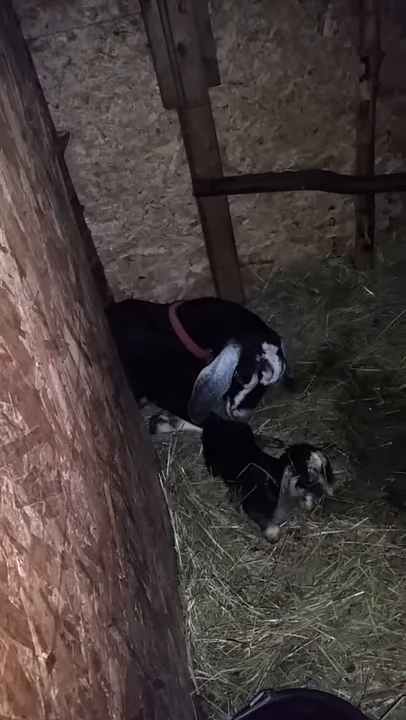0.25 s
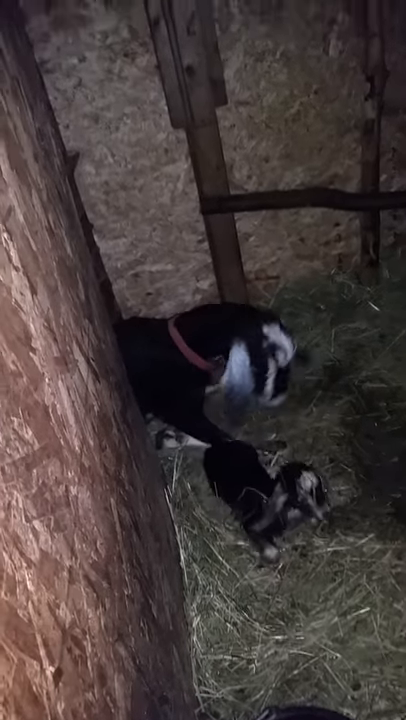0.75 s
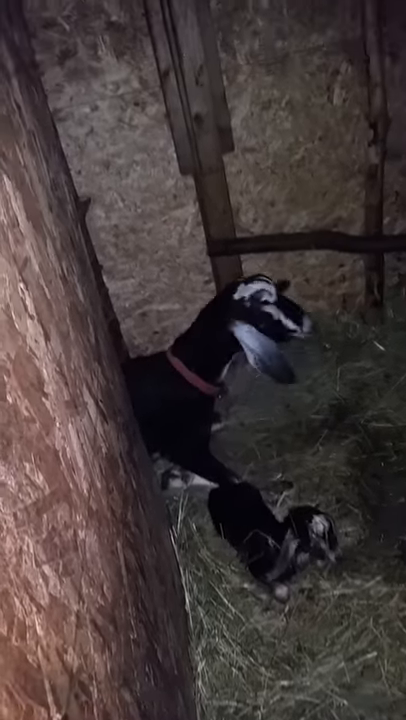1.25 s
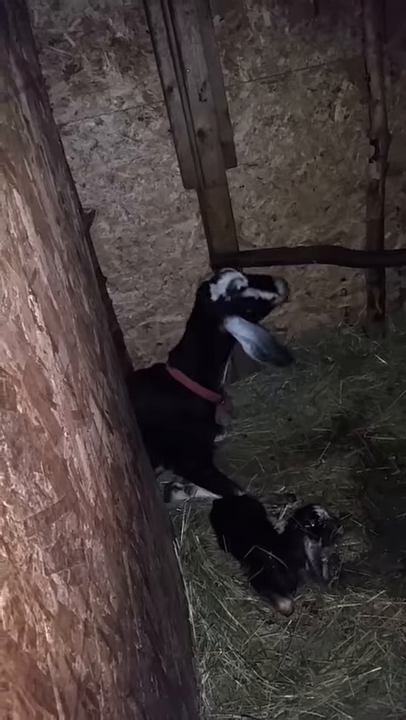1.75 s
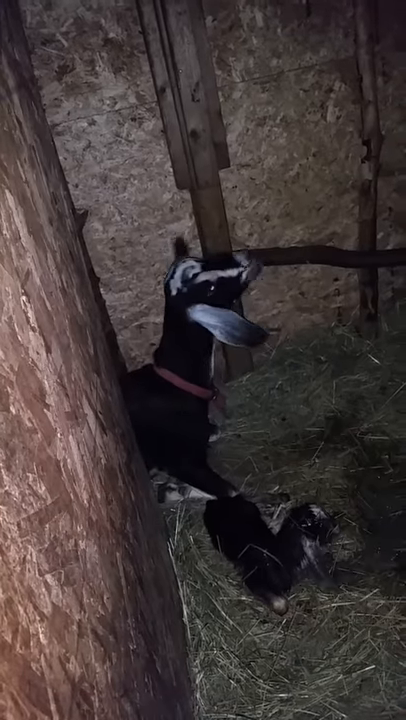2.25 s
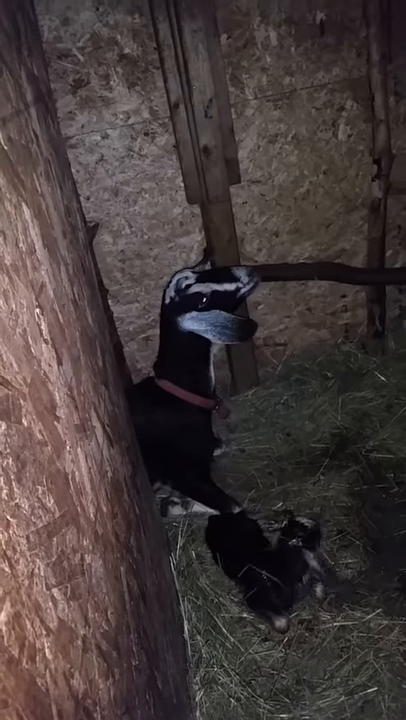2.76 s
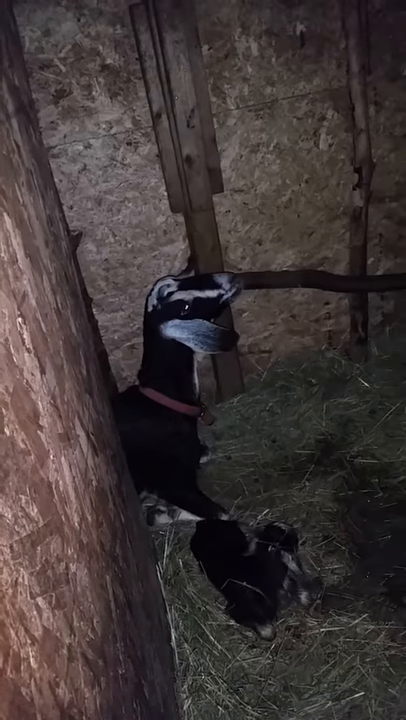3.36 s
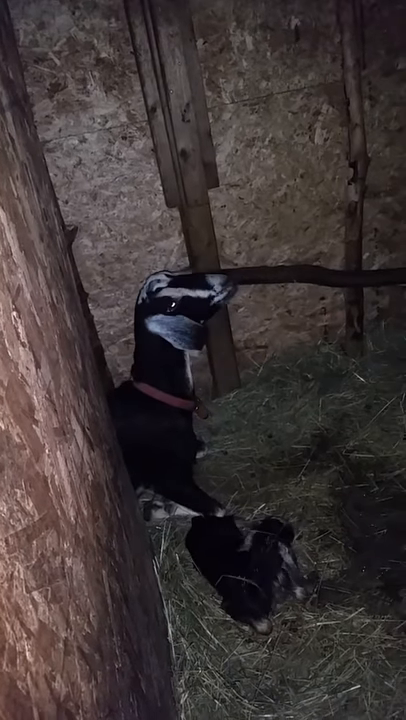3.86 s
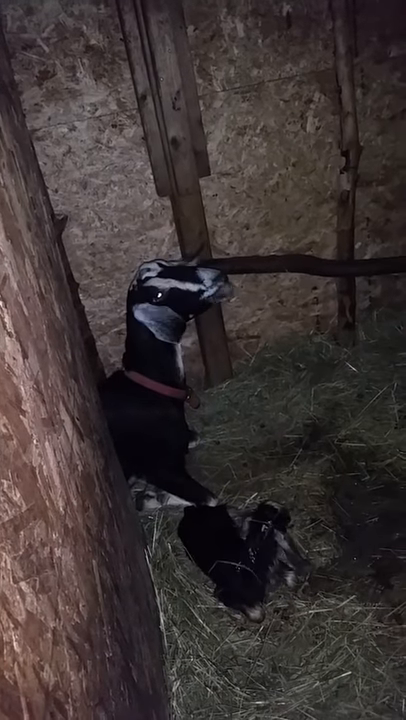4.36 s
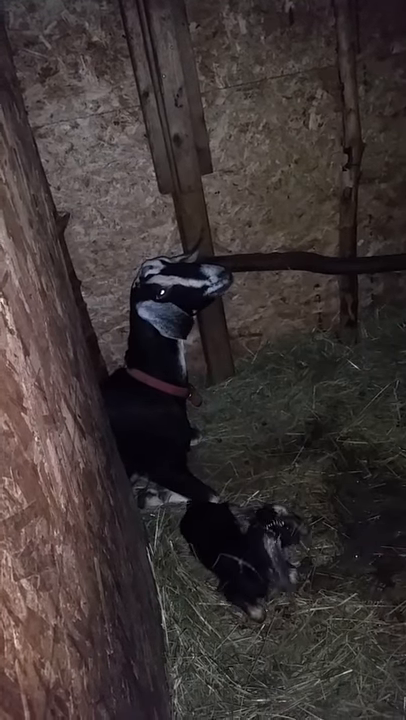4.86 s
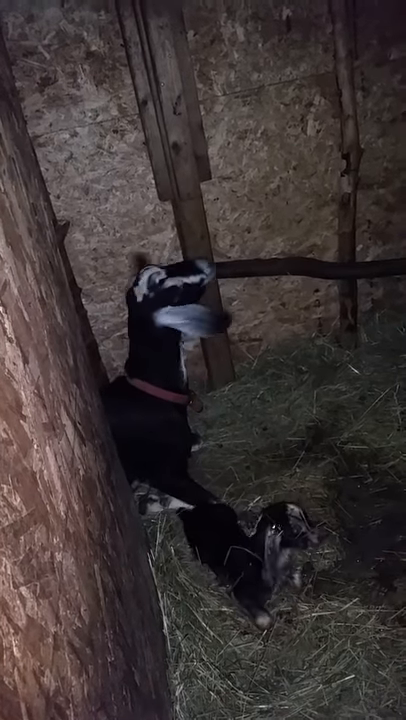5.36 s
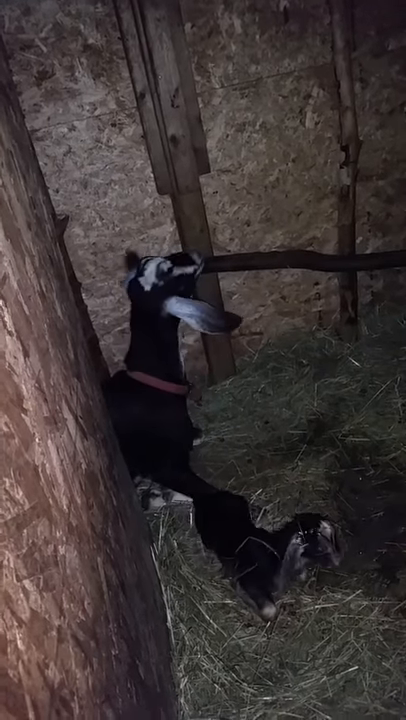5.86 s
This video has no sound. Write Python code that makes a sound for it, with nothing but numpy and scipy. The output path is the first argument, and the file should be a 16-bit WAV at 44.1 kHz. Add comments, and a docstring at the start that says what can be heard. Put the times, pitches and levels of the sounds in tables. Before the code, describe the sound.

Handheld phone in a quiet goat pen: low rumble, thin hiss that comes and goes, dull handling bumps and slight straw rustles. A nearby goat hums through its nose in brief broken pulses, twice in the calm first half. Then a large dog beyond the left wall erupts in three gruff barks, low growls and soft woofs, and two final barks, the boards giving a short dense ring. The goat grunts weakly underneath.

```python
"""Goat pen with a dog outside

Wooden shed bedded with straw. A goat close by on the left gives short nasal bleats: a buzz shaped by the nose.
Outside, a big dog barks three times, then twice, with soft woofs and growls between: pitch-arched partials
and throat noise, dulled by the walls; the shed rings as a dense decaying noise tail.
A fine high hiss comes and goes over a low rumble (filtered noise), with a few brief straw rustles;
bumps on the hand-held phone are damped swings."""
import sys
import numpy as np
from scipy import signal
from scipy.fft import rfft, irfft
from scipy.io import wavfile
from scipy.ndimage import uniform_filter1d

SR = 44100
rng = np.random.default_rng(int(sys.argv[2]) if len(sys.argv) > 2 else 0)


def wrap_up_sound(samples):
    """Save the sound to the file named by the first command line argument, as 16-bit audio."""
    columns = np.atleast_2d(samples).T
    # keep every value between -1 and 1, then stretch to whole-number steps
    tamed = np.clip(columns, -1, 1)
    steps = np.round(tamed * 32767).astype(np.int16)
    wavfile.write(sys.argv[1], SR, steps)


N = 269583
T = np.arange(N) / SR

# Background. Levels over time are relative; gains follow in background().
# rumble spectrum: (frequency [Hz], gain [dB])
RUMBLE_SPECTRUM = [(12, -40), (20, -11.5), (38, -1), (102, -1), (138, -13.5), (255, -12.5), (387, -19.5),
                   (439, -13.5), (526, -20), (905, -31.5), (1500, -34), (1950, -76.5), (3300, -120)]
# low rumble: (time [s], level [dB])
RUMBLE_LEVEL_DB = [(0.0, -60), (0.34, -64), (0.71, -60.5), (0.92, -66.5), (1.87, -62.5), (2.64, -67),
                   (3.18, -61), (3.3, -58), (3.79, -60.5), (4.3, -60), (4.53, -63.5), (4.76, -63),
                   (4.93, -54.5), (5.09, -57.5), (5.33, -60), (5.72, -59.5), (5.82, -61.5), (6.11, -71.5)]
# rumble colour at each microphone: (frequency [Hz], gain [dB])
RUMBLE_LEFT = [(30, -7.5), (70, -1.0), (150, 9.5)]
RUMBLE_RIGHT = [(30, 13.3), (70, 0.83), (150, 1.1)]
# murmur of the air in the shed: (time [s], level [dB])
AIR_LEVEL_DB = [(0, -70), (.8, -73), (1.15, -70), (1.5, -71), (2.3, -69.5), (2.7, -77), (3.2, -68),
                (4.6, -67), (6.1, -65.5)]
# microphone noise spectrum: (frequency [Hz], gain [dB])
MIC_SPECTRUM = [(500, -3.5), (1000, -3), (1500, -2), (2400, 4), (2800, -0.5), (3500, -12), (5000, -16),
                (8500, -19), (10000, -22.5)]
# high hiss spectrum: (frequency [Hz], gain [dB])
HISS_SPECTRUM = [(4000, -27), (7800, -33), (9000, -16.5), (9700, -4.5), (10400, -3), (12000, 3),
                 (13500, -9), (15600, -4)]
# high hiss: (time [s], level [dB])
HISS_LEVEL_DB = [(0.0, -85), (0.54, -85.5), (0.66, -76), (0.95, -92.5), (2.11, -84.5), (2.6, -93),
                 (3.18, -91.5), (3.42, -82), (3.57, -78), (4.2, -74.5), (4.61, -82), (4.93, -82.5),
                 (5.34, -74), (5.7, -79), (5.89, -81), (6.11, -88)]
# brief straw rustles, same spectrum as the hiss: (middle [s], half length [s], relative level [dB])
STRAW_RUSTLES = [(0.608, 0.058, -69), (1.835, .012, -80), (3.407, .016, -68), (3.5, .014, -72),
                 (5.721, 0.017, -64), (5.78, 0.034, -67.5)]

# bumps on the phone: (time [s], relative level [dB], swing pitch [Hz])
PHONE_BUMPS = [(0.071, -43.5, 61), (1.162, -55, 64.6), (1.3, -54, 75.4), (2.251, -48, 51.1),
               (2.457, -57, 48.4), (3.108, -52, 59.2), (3.157, -53.5, 75.4), (4.398, -44.5, 61.9),
               (4.982, -42, 56.5), (5.029, -43, 83.4), (5.235, -43, 71.4), (6.048, -48, 43.1)]
# bump colour at the left microphone: (frequency [Hz], gain [dB])
BUMP_LEFT = [(35, -6), (80, -2.5), (200, -5.5)]

# reverberation of the shed: (frequency [Hz], t60 before straw damping [s])
SHED_T60 = [(200, 0.08), (500, 0.56), (1000, 0.76), (2500, 0.99), (5000, 1), (12000, 0.72)]

# bleats: (middle [s], nominal length [s], top pitch [Hz], nose level [dB], rasp level [dB],
#          whistle level before a common trim [dB])
GOAT_BLEATS = [(0.082, 0.047, 458.6, -60.5, -91, -69.5), (0.194, 0.062, 482.4, -48, -72, -56.5),
               (.312, 0.09, 445.3, -62.5, -86, -78), (1.711, 0.05, 469.6, -57, -94, -70.5),
               (1.828, 0.064, 479.6, -51, -71, -58), (1.951, 0.089, 478.5, -52.5, -69.5, -57),
               (2.041, 0.078, 451.4, -62, -83, -69), (3.388, 0.063, 456, -63, -75, -67),
               (3.447, 0.079, 473, -68, -67.5, -71), (3.501, 0.056, 487.4, -44.5, -62, -53),
               (3.585, 0.12, 462, -72, -73.5, -78), (5.007, 0.041, 473.2, -52, -79, -65)]
# goat's nose, mouth shut: (frequency [Hz], gain [dB])
NOSE_RESONANCE = [(300, 4), (480, 2.5), (950, 0), (1430, -2.5), (1900, -0.5), (2380, -7.5), (3300, -25),
                  (4500, -29.5), (6000, -39.5), (7800, -61.5), (14000, -53)]
# rasp in its nostrils: (frequency [Hz], gain [dB])
NOSTRIL_RASP = [(2700, -11.5), (3400, -23), (4050, 1), (4500, 1.5), (5100, -10.5), (6100, -14.5),
                (6500, -14), (6900, -10), (7600, -36)]
# its thin whistle: (frequency [Hz], gain [dB])
NOSE_WHISTLE = [(6500, -28), (7800, -27.5), (8500, -3), (9000, 5), (9500, -5), (10300, -3.5), (11000, -19),
                (12700, -16), (14000, -46)]
# goat at the right microphone: (frequency [Hz], gain [dB])
GOAT_FAR_SIDE = [(500, -24.0), (2000, -27), (4500, -28), (9000, -39)]
# goat's sound sent to the shed: (frequency [Hz], gain [dB])
GOAT_RING = [(4500, 0), (9000, -10)]

# dog's throat heard through the wall: (frequency [Hz], gain [dB])
DOG_THROAT = [(280, -11), (420, 3.5), (540, 2.5), (670, -10), (840, 2), (1080, -6.5), (1230, -8),
              (1400, -19), (1620, -18.5), (1850, -24), (2120, -17), (2700, -30.5), (3400, -50), (4050, -45),
              (4800, -57), (7000, -63)]
# growls: (start [s], length [s], mid pitch [Hz], low level [dB], throat level [dB])
DOG_GROWLS = [(3.305, 0.058, 165, -48.5, -63), (4.142, 0.12, 210.5, -51, -51),
              (4.383, 0.11, 211.7, -47, -50.5), (4.725, 0.086, 148.8, -49.5, -67.5),
              (4.84, .05, 157.4, -53, -63.5), (5.131, 0.032, 201, -42, -53.5),
              (5.283, 0.1, 202.2, -51, -51.5), (5.667, 0.056, 205.6, -48, -52)]
# barks, delays from the start: (start [s], length before release [s], slack pitch [Hz], top pitch before scoop [Hz],
#         pitch top delay [s], chest peak delay [s], jaw widest delay [s], jaw opening width [s],
#         chest peak level [dB], open mouth level [dB], edge level at top pitch [dB],
#         hoarseness re tone at top pitch [dB])
DOG_BARKS = [(3.336, 0.16, 384.8, 441.4, 0.091, 0.076, 0.048, 0.067, -40.5, -38.5, -54, -5),
             (3.617, 0.17, 397.9, 438.6, 0.12, 0.11, 0.077, 0.028, -40.5, -30.5, -59, -8.5),
             (3.838, 0.11, 383.4, 392.2, .05, 0.036, 0.11, .032, -46.5, -38.5, -62.5, -2.5),
             (3.938, 0.16, 412, 547.7, 0.072, 0.092, .108, 0.014, -29.5, -32, -48.5, -22),
             (4.257, 0.068, 406.5, 495.3, .078, 0.027, 0.031, 0.1, -43.5, -48, -59.5, -11),
             (4.813, 0.16, 325, 386, .068, .1, 0.085, 0.044, -52.5, -50, -62.5, -6),
             (5.075, 0.18, 395.6, 532.4, 0.13, 0.11, 0.11, 0.074, -32, -34.5, -52.5, -13.5),
             (5.465, 0.15, 396.7, 457.8, 0.12, 0.11, 0.062, 0.027, -38.5, -29.5, -62.5, -9.5)]
# hiss scattered by the boards: (frequency [Hz], gain [dB])
BOARD_SCATTER = [(300, -4.5), (1000, 12.5), (2500, 1.0), (3400, -9.0),
                 (4100, -15.5), (5500, -18), (7500, -27), (12000, -61.5)]
# dog at the right microphone: (frequency [Hz], gain [dB])
DOG_FAR_SIDE = [(200, -12.5), (520, -13.0), (850, -20), (1300, -24.5), (2500, -14.5)]

TOP_HZ = 15700
BREATH_DB_PER_DB = 0.35  # extra bleat breath per dB of softness
GROWL_FADE_S, GROWL_SAG_HZ_PER_S = 0.012, 128
PUSH_S, PUSH_FLATNESS = 0.064, 2.9  # half width and shape of the pitch arch
CHEST_DB_PER_HZ, EDGE_DB_PER_HZ, CLEARING_DB_PER_HZ = 0.2, 0.09, 0.34  # higher: louder, brighter, clearer
ATTACK_S, ATTACK_DB, RELEASE_DB_PER_S = 0.033, 17, 213
SCOOP_HZ, SCOOP_S = 70.64, 0.036  # initial flatness and its decay time
HOARSEST_DB = -1.5  # ceiling of hoarseness re tone
JAW_DB = 13.5  # mouth loss with the jaw shut


def undb(db):
    """Decibels to gain."""
    return 10 ** (np.asarray(db) / 20)


def unit(x):
    """Scale to rms 1."""
    return x / np.sqrt(np.mean(x ** 2) + 1e-20)


def curves(rows, t):
    """Interpolate every column of a table linearly in time."""
    s, *columns = np.transpose(rows)
    return [np.interp(t, s, c) for c in columns]


def at_pitch(points, hz):
    """Read a (Hz, value) table on a log-frequency axis."""
    f, value = np.transpose(points)
    return np.interp(np.log(hz + 1), np.log(f), value)


def colour(x, points):
    """Filter by a (Hz, dB) table, zero phase."""
    n = x.shape[-1]
    hz = np.arange(n // 2 + 1) * SR / n
    return irfft(rfft(x) * undb(at_pitch(points, hz)), n)


def band(x, lo_hz, hi_hz):
    """Steep zero-phase band-pass."""
    edges_hz = [lo_hz, min(hi_hz, SR / 2 - 100)]
    return signal.sosfiltfilt(signal.butter(3, edges_hz, "band", fs=SR, output="sos"), x)


def walk(rate_hz, n):
    """Smooth random fluctuation, rms near 1."""
    k = max(int(SR / rate_hz), 1)
    steps = np.repeat(rng.standard_normal(n // k + 1), k)
    return unit(uniform_filter1d(steps, k))[:n]


def steady(x):
    """Level a sound to a running rms of 1."""
    return x / np.sqrt(np.abs(uniform_filter1d(x ** 2, size=900)) + 1e-12)


def place(x, left_db, right_db):
    """Set the gains at the two microphones."""
    return x * undb([[left_db], [right_db]])


def shed(x, build_s, straw_s=1):
    """Dense reflections between the boards, independent per microphone; nearby straw damps them."""
    t = T[:SR]
    tail = 0
    for hz in 125 * 2 ** np.arange(7):
        noise = band(rng.standard_normal((2, SR)), hz / np.sqrt(2), hz * np.sqrt(2))
        tail = tail + noise * np.exp(-np.log(1000) * t / at_pitch(SHED_T60, hz))
    tail = tail * (1 - np.exp(-t / build_s)) * np.exp(-t / straw_s)
    tail = unit(tail) / np.sqrt(2 * SR)
    return signal.fftconvolve(x[None], tail, axes=1)[:, :N]


def background(flicker_db=3.0, rumble_db=2, hiss_db=2):
    """Filtered noise: low rumble, shed air, microphones, a high hiss that swells and fades, brief rustles."""
    floor = colour(rng.standard_normal((2, N)), RUMBLE_SPECTRUM)
    low_db = rumble_db + curves(RUMBLE_LEVEL_DB, T)[0] + flicker_db * walk(20.98, N)
    low = unit(band(floor, 31, 190)) * undb(low_db)
    low = np.array([colour(low[0], RUMBLE_LEFT), colour(low[1], RUMBLE_RIGHT)])
    air = unit(band(floor, 150, 1300)) * undb(curves(AIR_LEVEL_DB, T)[0] + 1.0 * walk(6.9, N))
    microphones = unit(colour(rng.standard_normal((2, N)), MIC_SPECTRUM))
    rustles = sum(undb(db) * np.exp(-((T - s) / half_s) ** 2) for s, half_s, db in STRAW_RUSTLES)
    hiss_and_rustles = np.hypot(undb(hiss_db + curves(HISS_LEVEL_DB, T)[0]), rustles)
    high = unit(colour(rng.standard_normal((2, N)), HISS_SPECTRUM))
    high = high * hiss_and_rustles * undb(0.4 * walk(33, N))
    return low + place(air, 8.7, 2.8) + place(microphones, -80.0, -82.0) + place(high, 7.44, -1.4)


def bumps(decay_s=0.023, knock_db=-7, case_hz=400, knock_s=0.0083):
    """Each bump sets the phone's case into a damped low swing with a soft noise knock."""
    out = np.zeros(N)
    for s, db, hz in PHONE_BUMPS:
        t = np.maximum(T - s, 0)
        swing = np.sin(2 * np.pi * hz * t) * np.exp(-t / decay_s)
        knock = unit(band(rng.standard_normal(N), 130, 260)) * np.exp(-t / knock_s) * (t > 0)
        out += undb(db) * (swing + undb(knock_db) * knock)
    out = signal.sosfilt(signal.butter(3, case_hz, fs=SR, output="sos"), out)
    # stronger at the right microphone, most of all the deepest swing
    return np.array([colour(out, BUMP_LEFT), undb(10.5) * out])


def goat(arch=0.06, jitter=0.011, breath_db=-12, whistle_tone_db=-1, brighten_db_per_db=0.62):
    """Closed-mouth bleats: pitch-arched harmonics and pulsed breath through the nose, plus rasp and whistle."""
    voice = np.zeros(N)
    for s, length, hz, db, rasp_db, whistle_db in GOAT_BLEATS:
        inside = np.abs(T - s) < length
        u = (T[inside] - s) / length
        n = len(u)
        pitch_hz = hz * (1 - arch * (2 * u) ** 2 + jitter * walk(400, n))
        phase = 2 * np.pi * np.cumsum(pitch_hz) / SR
        buzz = unit(sum(np.cos(k * phase + rng.uniform(0, 2 * np.pi)) for k in range(1, 29)))
        air = rng.standard_normal(n) * (1 + np.cos(phase))
        # a harder push leaves less in the fundamental
        effort = [(480, np.clip(-brighten_db_per_db * (db + 49.5), -10, 3)), (950, 0.0013)]
        # a softer push lets more air through
        leak_db = breath_db + BREATH_DB_PER_DB * max(-42 - db, 0)
        nose = colour(buzz + undb(leak_db) * air, NOSE_RESONANCE)
        nose = unit(colour(nose, effort)) * undb(db)
        breathy = undb(whistle_tone_db) * buzz + air
        rasp = unit(colour(breathy, NOSTRIL_RASP)) * undb(rasp_db)
        whistle = unit(colour(breathy, NOSE_WHISTLE)) * undb(whistle_db - 1.5)
        swell = np.exp(-np.abs(u / 0.4) ** 2.4) * undb(walk(160, n))
        voice[inside] += swell * (nose + rasp + whistle)
    # the right microphone is shaded, most in the treble
    far_side = colour(voice, GOAT_FAR_SIDE)
    ring = shed(colour(voice, GOAT_RING), build_s=0.003, straw_s=0.03)
    return np.array([voice, far_side]) + place(ring, -7.5, -11.5)


def growl(start, length, hz, db, throat_db, jitter=0.028, shimmer_db=0.0, air_db=-2, flutter_db=-2.0):
    """The folds flap at about half a bark's pitch, slowly sagging, and air rasps in the throat."""
    inside = (T > start - GROWL_FADE_S) & (T < start + length + GROWL_FADE_S)
    t = T[inside] - start
    n = len(t)
    pitch_hz = (hz - GROWL_SAG_HZ_PER_S * (t - length / 2)) * (1 + jitter * walk(250, n))
    phase = 2 * np.pi * np.cumsum(pitch_hz) / SR
    flutter = unit(band(rng.standard_normal(n), 92, 230))
    low = steady(np.cos(phase) + undb(flutter_db) * flutter)
    air = unit(colour(rng.standard_normal(n) * (1 + np.cos(phase)), DOG_THROAT))
    throat = unit(np.cos(2 * phase) + undb(air_db) * air)
    fade = np.clip(np.minimum(t - t[0], t[-1] - t) / (2 * GROWL_FADE_S), 0, 1)
    out = np.zeros(N)
    out[inside] = (undb(db) * low + undb(throat_db) * throat) * fade * undb(shimmer_db * walk(90, n))
    return out


def bark(start, length, low_hz, top_hz, top_s, loudest_s, widest_s, open_s, chest_db, mouth_db, edge_db,
         hoarse_db, jitter=0.01377, shimmer_db=2.0, half_db=-8, upper_rasp_db=4):
    """Hoarse bark: a push arches the pitch, making it louder and clearer, while the jaw opens and shuts."""
    inside = (T > start) & (T < start + length + 40 / RELEASE_DB_PER_S)  # through 40 dB of release
    t = T[inside] - start
    n = len(t)

    def slack(peak_s):
        """Pitch shortfall in Hz for a push that peaks at peak_s."""
        return (top_hz - low_hz) * (1 - np.exp(-np.abs((t - peak_s) / PUSH_S) ** PUSH_FLATNESS))

    slack_hz, chest_slack_hz = slack(top_s), slack(loudest_s)
    hz = top_hz - slack_hz - SCOOP_HZ * np.exp(-t / SCOOP_S)
    shut = 1 - np.exp(-((t - widest_s) / open_s) ** 2)
    rasp_db = np.minimum(hoarse_db + CLEARING_DB_PER_HZ * slack_hz, HOARSEST_DB)
    wobble = jitter * (0.7 + undb(rasp_db)) * walk(250, n)
    phase = 2 * np.pi * np.cumsum(hz * (1 + wobble)) / SR
    partials = sum(np.cos(k * phase + rng.uniform(0, 2 * np.pi)) for k in range(1, 13))
    tone = unit(colour(partials, DOG_THROAT))
    # strong and weak cycles alternate; air tears through once a cycle
    subharmonics = sum(np.cos((k + 0.5) * phase + rng.uniform(0, 2 * np.pi)) for k in range(1, 12))
    halves = unit(colour(subharmonics, DOG_THROAT))
    air = unit(colour(rng.standard_normal(n) * (1 + 1.1 * np.cos(phase)), DOG_THROAT))
    hoarse = undb(rasp_db) * (air + undb(half_db) * halves)
    chest = steady(band(tone + hoarse, 300, 645)) * undb(chest_db - CHEST_DB_PER_HZ * chest_slack_hz)
    mouth = steady(band(tone + hoarse, 658, 1470)) * undb(mouth_db - JAW_DB * shut)
    # upper partials are the hoarser
    edge = steady(band(tone + undb(upper_rasp_db) * hoarse, 1180, 6500))
    edge = edge * undb(edge_db - EDGE_DB_PER_HZ * slack_hz)
    attack_db = -ATTACK_DB * np.maximum(1 - t / ATTACK_S, 0)
    release_db = -RELEASE_DB_PER_S * np.maximum(t - length, 0)
    out = np.zeros(N)
    out[inside] = (chest + mouth + edge) * undb(attack_db + release_db + shimmer_db * walk(90, n))
    return out


def dog():
    """Barks and growls come through the left wall, ring in the shed and scatter off its boards."""
    voice = sum(bark(*row) for row in DOG_BARKS) + sum(growl(*row) for row in DOG_GROWLS)
    # the boards scatter a dull hiss that follows the voice
    loudness = np.sqrt(np.abs(uniform_filter1d(voice ** 2, size=900)))
    scatter = loudness * unit(colour(rng.standard_normal(N), BOARD_SCATTER))
    # the right microphone is shaded
    direct = np.array([undb(3.0) * voice, colour(voice, DOG_FAR_SIDE)])
    ring = place(shed(voice, build_s=0.0035), -2.5, -21.0)
    late_hiss = place(shed(scatter, build_s=0.22), -26.5, -27.0)
    return direct + ring + late_hiss


def scene():
    """Sum of the pen and the dog outside."""
    return background() + bumps() + goat() + dog()


def record(dry):
    """The phone cuts the top: steep elliptic low-pass."""
    return signal.sosfilt(signal.ellip(10, 0.2, 70, TOP_HZ, fs=SR, output="sos"), dry)


dry = scene()
out = record(dry)
wrap_up_sound(out)
```